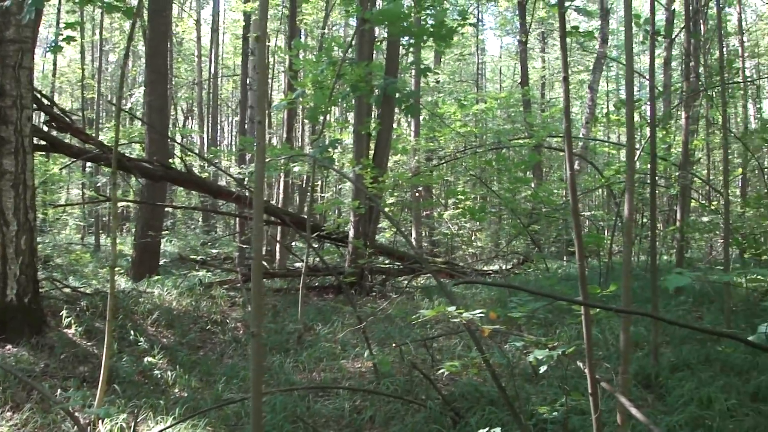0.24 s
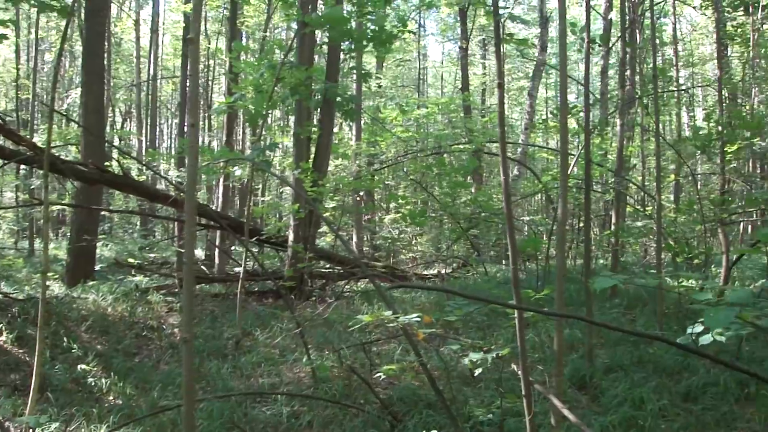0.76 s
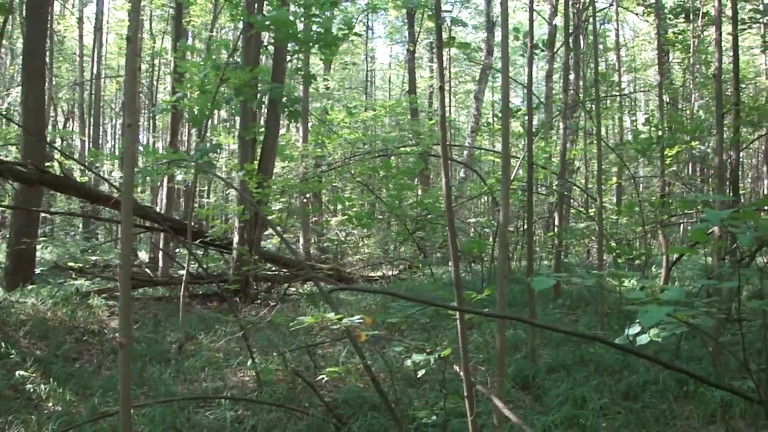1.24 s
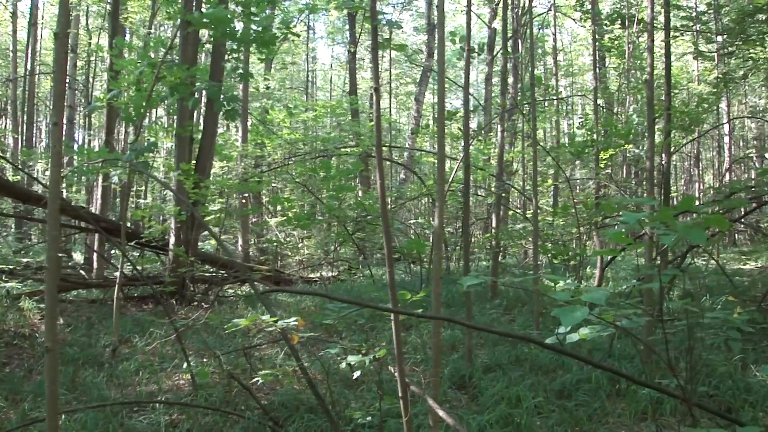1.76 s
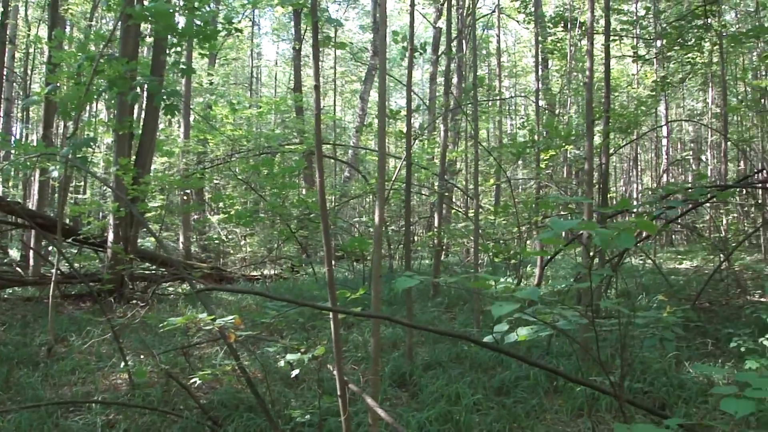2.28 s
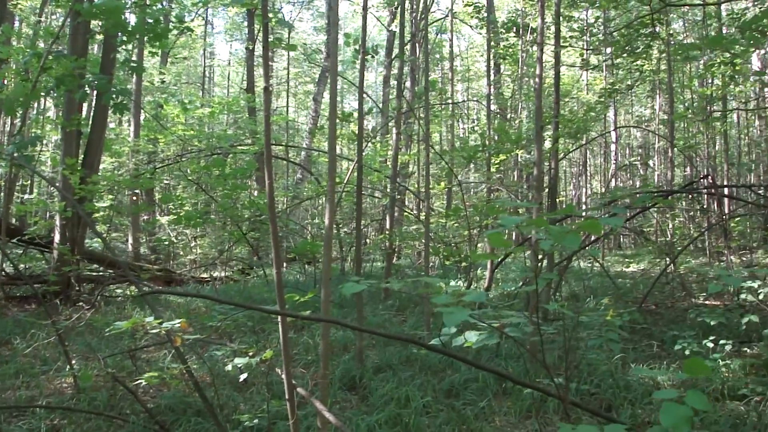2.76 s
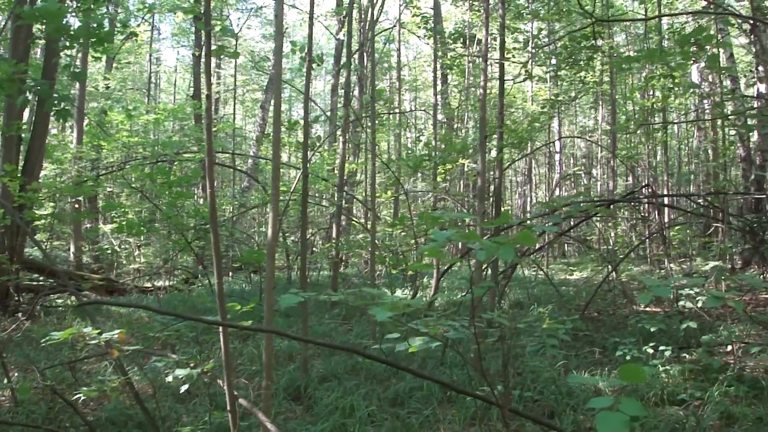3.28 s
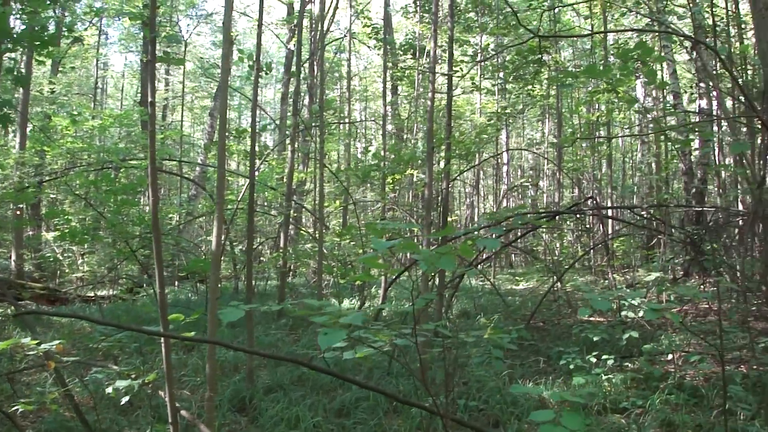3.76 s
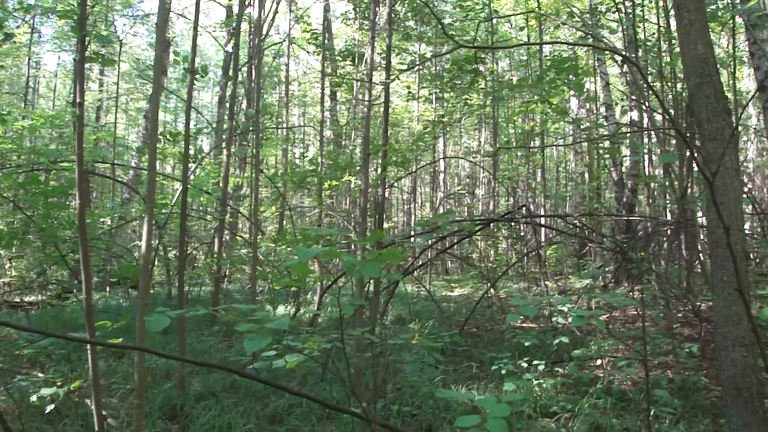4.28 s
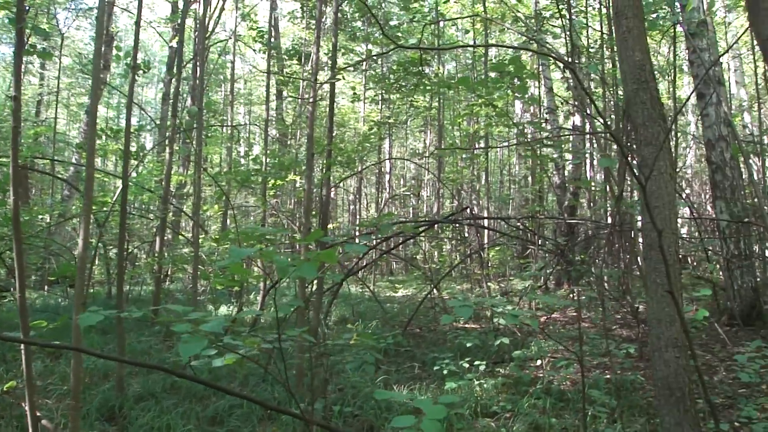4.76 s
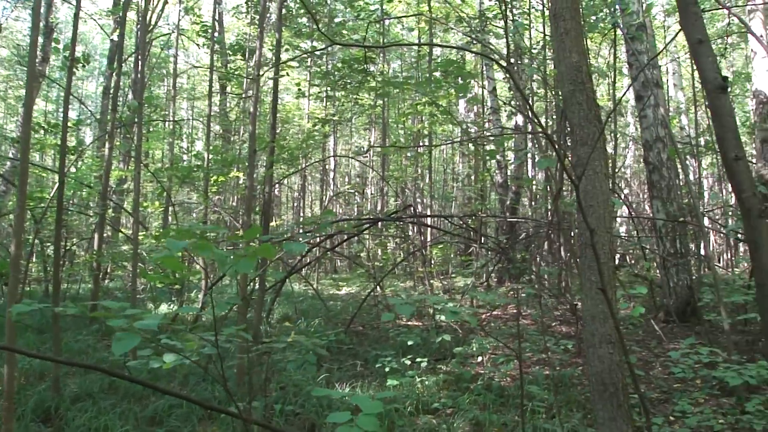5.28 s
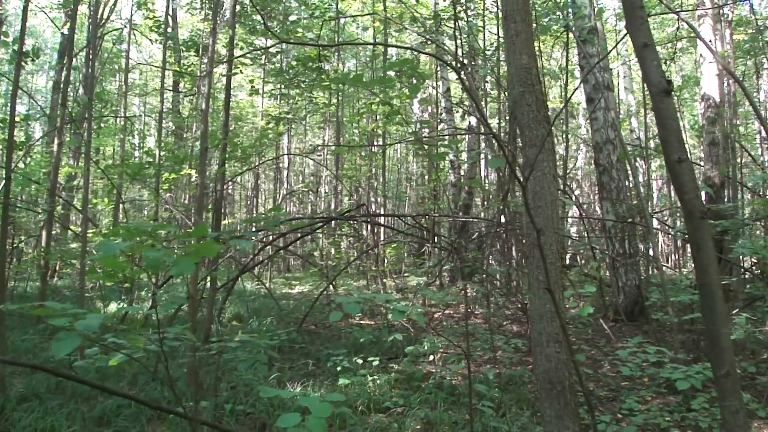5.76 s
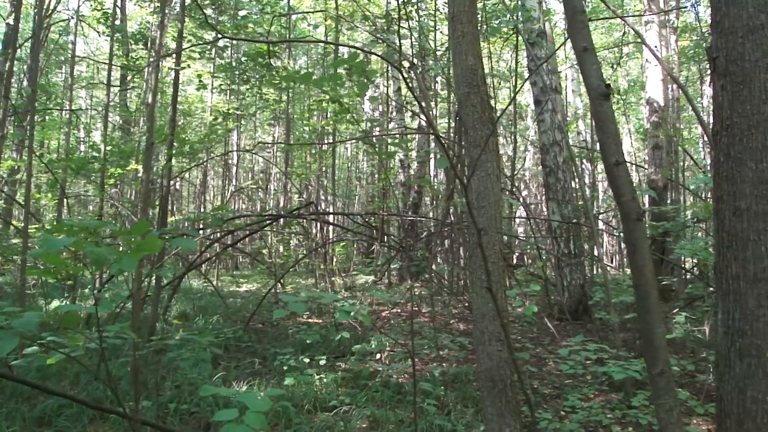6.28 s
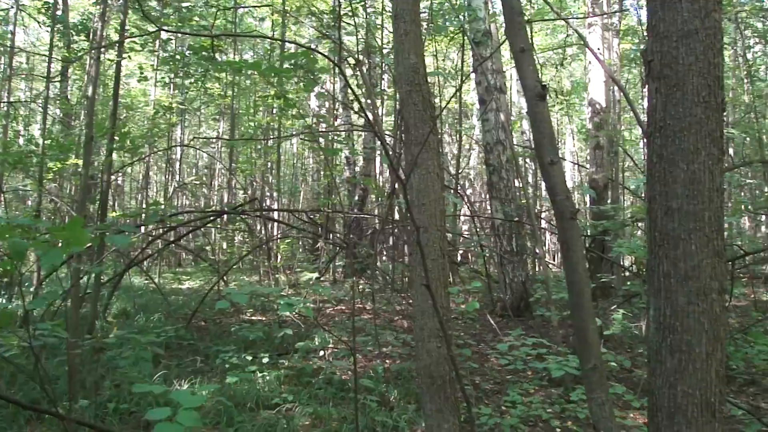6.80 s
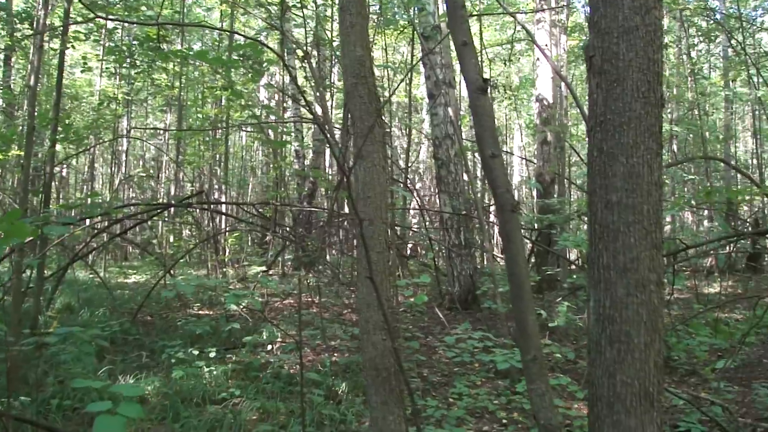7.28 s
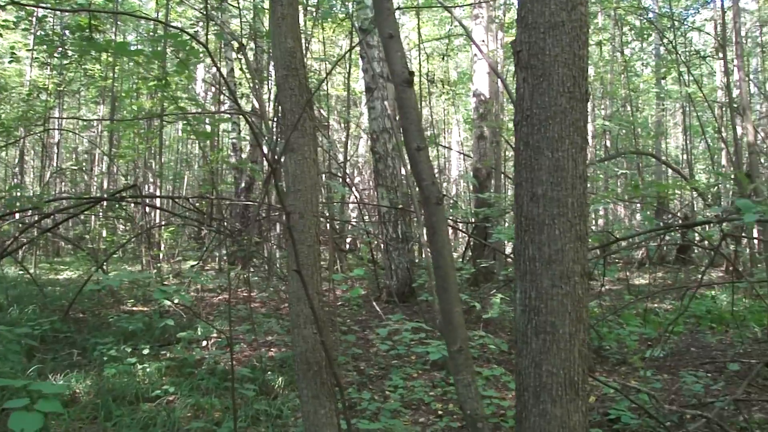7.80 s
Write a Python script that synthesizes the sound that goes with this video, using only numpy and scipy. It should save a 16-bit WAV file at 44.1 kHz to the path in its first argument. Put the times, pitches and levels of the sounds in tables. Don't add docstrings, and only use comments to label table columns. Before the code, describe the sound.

Steady even hiss of countless leaves in a summer forest, slowly rising, with low wind thumps on the microphone thickening at the end.

```python
import sys
import numpy as np
from scipy import signal
from scipy.fft import rfft, irfft, next_fast_len
from scipy.io import wavfile
from scipy.ndimage import uniform_filter1d, map_coordinates

SR = 44100
rng = np.random.default_rng(int(sys.argv[2]) if len(sys.argv) > 2 else 0)


def dump_mix(stems):
    frames = np.atleast_2d(stems).T
    limited = np.clip(frames, -1, 1)
    pcm = np.round(limited * 32767).astype(np.int16)
    wavfile.write(sys.argv[1], SR, pcm)


def volts_from_db(level):
    exponent = np.asarray(level, float) / 20
    return 10 ** exponent


N = 354519

# time in seconds, level in dB, left-right difference in dB.
WIND = [(0, -46.5, 0), (.6, -45, -.5), (1.3, -43.5, -1.6), (2.4, -42.5, -1.8), (2.7, -41.5, -2.2),
        (3.3, -41, -2.5), (5, -40.5, -3), (8.04, -41.5, -3)]
# time in seconds, lead of the right port in microseconds.
CAMERA_TURN = [(0, -7), (1.5, -3), (2.5, 1), (3.5, 4), (4.5, 9), (5.5, 12), (6.5, 14), (8, 16)]
# frequency in Hz, share of the left-right level difference (ratio).
BODY_SHADE = [(100, 0.45), (400, 1.4), (1400, 1.04), (2400, 2.28), (5500, 1.06), (9000, 0.14), (14000, .05)]


def unit(x):
    return x / np.sqrt(np.mean(x ** 2) + 1e-20)


def along(points, hz):
    f, v = np.transpose(points)
    return np.interp(np.log(hz + 1), np.log(f + 1), v)


def curves(rows, t):
    s, *cols = np.transpose(rows)
    return [np.interp(t, s, c) for c in cols]


def wobble(rate):
    knots = rng.standard_normal(int(N * rate / SR) + 4)
    return map_coordinates(knots, [np.arange(N) * rate / SR])


def coloured(x, spectrum):
    m = next_fast_len(N + 8192)
    gain = volts_from_db(along(spectrum, np.fft.rfftfreq(m, 1 / SR)))
    return irfft(rfft(x, m) * gain, m)[..., :N]


def heard(source, shape, patchy_db):
    # frequency in Hz, left-right likeness (correlation).
    alike = [(60, 0), (150, 0.23), (300, 0.55), (600, 0.62), (2400, 0.86), (3400, 0.8), (4800, 0.85),
             (7500, 0.82), (10300, 0.73), (11700, .52)]
    hz, t, z = signal.stft(source, SR, nperseg=1024)
    hz = hz[:, None]
    colour_db, pan_db, lead = shape(hz, t)

    patches = uniform_filter1d(rng.standard_normal(z.shape[1:]), size=9, axis=0)
    patches = uniform_filter1d(patches, size=12, axis=1)
    gain = volts_from_db(colour_db + patchy_db * unit(patches))
    gain = gain / np.sqrt(np.mean(volts_from_db(colour_db) ** 2, axis=0))

    spread = np.arccos(np.clip(along(alike, hz), -1, 1)) / 2
    mid = gain * z[0] * np.cos(spread)
    side = gain * z[1] * np.sin(spread)
    aside = volts_from_db(pan_db / 2) * np.exp(-1j * np.pi * hz * lead)
    ports = [(mid + side) * aside, (mid - side) / aside]
    return unit(signal.istft(ports, SR, nperseg=1024)[1][:, :N])


def fizz():
    # time in seconds, left-right likeness (correlation).
    fizz_alike = [(0, .4), (1.2, .5), (3.6, .55), (4.4, .08), (6, -.1), (8, -.25)]
    strip = [(13550, -70), (13850, -3), (14500, 0), (15100, -4), (15400, -24)]  # Hz, dB
    mid, side = unit(coloured(rng.standard_normal((2, N)), strip))
    spread = np.arccos(curves(fizz_alike, np.arange(N) / SR)[0]) / 2
    mid, side = mid * np.cos(spread), side * np.sin(spread)
    pair = np.array([mid + side, mid - side])
    return coloured(volts_from_db(-75.5 + 1.1 * wobble(20)) * pair, [(13500, -60), (13750, -3)])


def crowns():
    # frequency in Hz, density in dB per Hz.
    crown_colour = [(30, -54), (60, -30), (120, -12.5), (190, -0.5), (300, -2.5), (600, -1), (1000, -2),
                    (1500, -7.5), (2500, -8.5), (5000, -48), (9000, -120)]

    def shape(hz, t):
        pan_db = -2.5 - 0.1 * curves(CAMERA_TURN, t)[0]
        return along(crown_colour, hz) + 0 * t, pan_db * along(BODY_SHADE, hz), 0

    t = np.arange(N) / SR
    wind_db = curves(WIND, t)[0]
    swell_db = 0.3 * (wind_db - wind_db.max())
    sway_db = 2 * np.exp(-((t - 2.62) / 0.051) ** 2)
    level_db = -55.5 + swell_db + sway_db
    rush = heard(rng.standard_normal((2, N)), shape, patchy_db=0.55)
    return volts_from_db(level_db + 3.0 + 0.3 * wobble(6)) * rush


def eddies():
    # time in seconds, peak in dB, pitch in Hz, half length in ms.
    eddy_pops = [(0.052, -24.5, 139, 3.1), (0.062, -37, 83, 3.6), (0.175, -37, 130, 3.2),
                 (0.508, -53.5, 75, 13), (0.706, -48, 126, 4.4), (0.932, -52, 92, 4.3),
                 (4.276, -38.5, 120, 8.2), (4.383, -40, 83, 4.8), (4.595, -47, 92, 6),
                 (5.959, -47, 83, 6.6), (6.154, -48, 75, 7.3), (6.283, -31.5, 92, 6),
                 (6.337, -39, 83, 5.5), (6.799, -35, 92, 6), (6.844, -38, 92, 6), (6.927, -50, 75, 10),
                 (7.341, -44, 83, 6.6), (7.405, -37, 92, 5), (7.488, -28.5, 114, 4.9),
                 (7.624, -33, 92, 8.1), (7.647, -17, 139, 3.7), (7.689, -16, 169, 5.8),
                 (7.716, -33, 126, 10.3), (7.802, -25.5, 126, 6.6), (7.829, -34, 126, 10.3),
                 (7.862, -23, 102, 4.6), (7.874, -13, 126, 2.6), (7.918, -22.5, 190, 2.5),
                 (7.945, -22.5, 160, 1.7), (8.035, -21, 171, 2.3),
                 (0.022, -35, 92, 6), (4.298, -41, 126, 3.2), (4.72, -55, 80, 6), (6.11, -52, 75, 6),
                   (6.235, -52, 60, 15), (6.385, -55, 68, 15), (7.469, -44, 83, 6.6),
                   (7.672, -30, 113, 2.6), (7.78, -34, 92, 6), (7.895, -32, 75, 8), (7.931, -23, 110, 4.7),
                   (7.958, -35, 90, 4.9), (8.017, -40, 83, 9)]
    # frequency in Hz, density in dB per Hz.
    puff_colour = [(20, -14), (40, -25), (65, -7), (110, -17), (200, -8), (400, -38), (800, -120)]
    # frequency in Hz, gain in dB.
    wind_cut = [(15, -30), (30, -18), (60, 1), (100, -1.5), (1000, 2.5)]
    calm_db, kink_db = -74, -15.5
    rise_s, tail_s = 0.03, 0.047

    pops, wake = np.zeros((2, N + SR)), np.zeros(N + SR)
    t = np.arange(-SR // 10, SR // 10) / SR
    rows = eddy_pops
    chances = rng.uniform(-0.76, 1, (len(rows), 4))
    for (s, db, hz, half_ms), (phase, kink, lag, share) in zip(rows, chances):
        start = round(s * SR)
        turn = 2 * np.pi * hz * t + np.pi * phase + np.array([[0.73 * lag], [0]])
        sharp = np.exp(-(t * hz / 1.4) ** 2)
        swing = np.cos(turn) + volts_from_db(kink_db) * sharp * np.cos(1.67 * turn + np.pi * kink)
        envelope = np.exp(-(t * 1000 / half_ms) ** 2 / 2)
        level = volts_from_db(db + np.array([[1.5 * share], [0]]))
        pops[:, start:][:, :len(t)] += level * envelope * swing
        wake_shape = np.exp(-(t / np.where(t < 0, rise_s, tail_s)) ** 2)
        wake[start:][:len(t)] += volts_from_db(-35 + 0.53 * db) ** 2 * wake_shape

    push, stray = coloured(rng.standard_normal((2, N)), puff_colour)
    lumps = unit(volts_from_db(2.5 * wobble(22)) * np.array([push + 0.49 * stray, push]))
    stir = np.sqrt(wake[SR // 10:][:N] + volts_from_db(calm_db + 4 * wobble(3.1)) ** 2)
    return coloured(pops[:, SR // 10:][:, :N], wind_cut) + stir * lumps


def taps(spread_db):
    return rng.standard_normal((2, N)) * volts_from_db(spread_db * rng.standard_normal((2, N)))


def leaves():
    # frequency in Hz, density in dB per Hz.
    leaf_colour = [(900, -42), (1500, -22.5), (2400, -10.5), (3000, -9.5), (3800, -7), (4200, -2.5),
                   (5000, 0), (6500, -2), (9800, -7), (11600, -13), (12500, -27.5), (12900, -31),
                   (13150, -75), (13400, -120)]

    def shape(hz, t):
        turn, pan_db = curves(CAMERA_TURN, t)[0], curves(WIND, t)[1]
        large_db = -10.5 + 0.15 * turn
        small_db = -8.5 - 0.21 * turn
        large = (large_db + 11) * along([(3400, 0.96), (4600, 0.071)], hz)
        small = (small_db + 9) * along([(7000, 0.035), (10500, 1.0)], hz)
        return along(leaf_colour, hz) + large + small, pan_db * along(BODY_SHADE, hz), turn * 1e-6

    level_db = curves(WIND, np.arange(N) / SR)[0]
    flurry_db = 0.25 * wobble(5.7) + 0.25 * wobble(18)
    return volts_from_db(level_db + 2.5 + flurry_db) * heard(taps(spread_db=1.5), shape, patchy_db=1.0)


def scene():
    opposite = volts_from_db([[-9.5], [-3.6]]) * [[-1], [1]]
    return fizz() + crowns() + eddies() * opposite + leaves()


def starved(x):
    # middle in seconds, length in seconds.
    dropouts = [(2.691, .06), (3.551, .055), (3.666, .095), (4.106, .055), (4.394, .08), (4.7, .025),
                (4.81, .03), (5.165, .085), (5.31, .025), (5.44, .03), (5.94, .055), (6.068, .035),
                (6.452, .055), (6.6, .025), (7.0, .025), (7.241, .055), (7.31, .025), (7.473, .055),
                (7.63, .03), (7.83, .025), (7.984, .05)]
    t = np.arange(N) / SR
    shut = sum(np.abs(t - s) < length / 2 for s, length in dropouts)
    top = coloured(x, [(12250, -80), (12400, 0)])
    return x - uniform_filter1d(shut * 1., size=200) * top


def roll_off(x):
    return signal.sosfilt(signal.butter(12, 15460, fs=SR, output="sos"), x)


def record(dry):
    return roll_off(starved(dry))


dry = scene()
out = record(dry)
dump_mix(out)
```